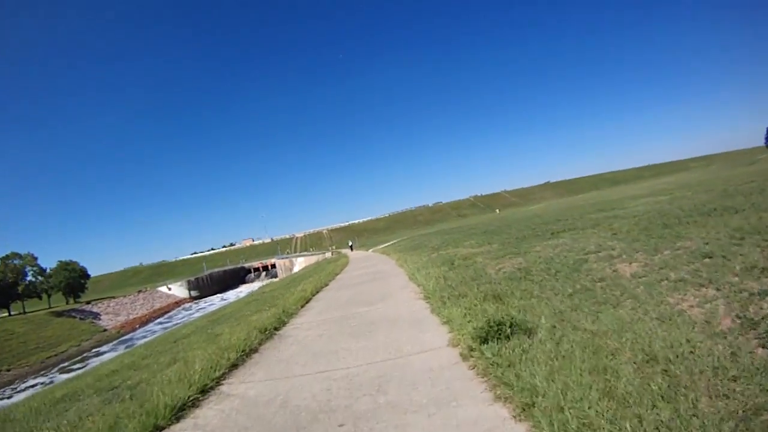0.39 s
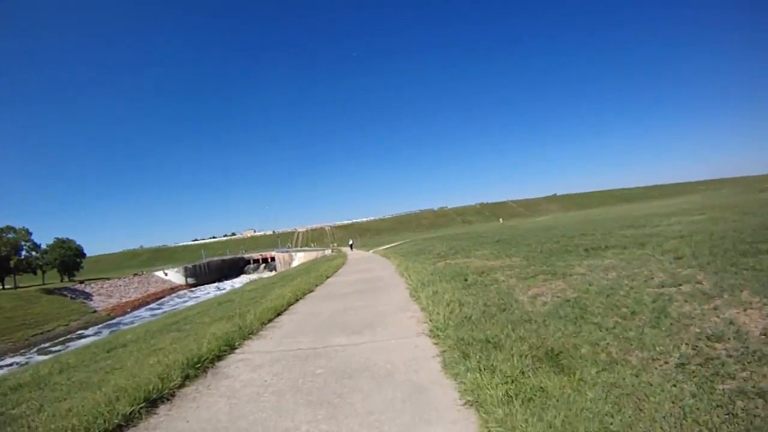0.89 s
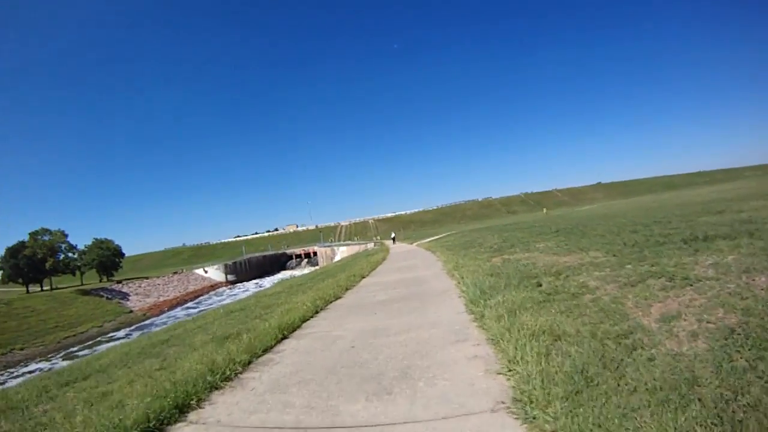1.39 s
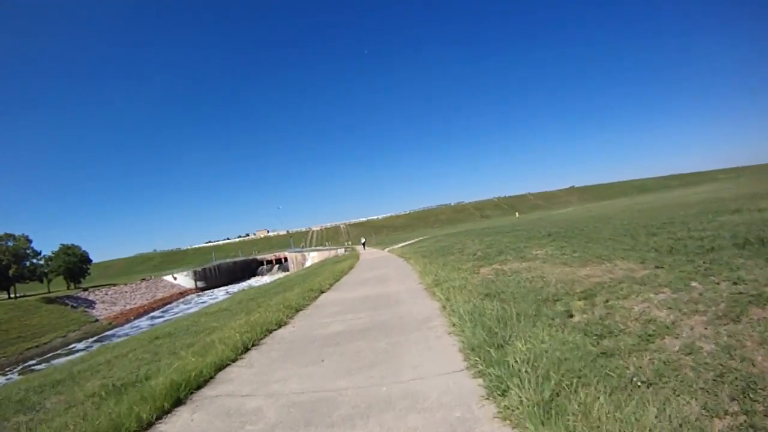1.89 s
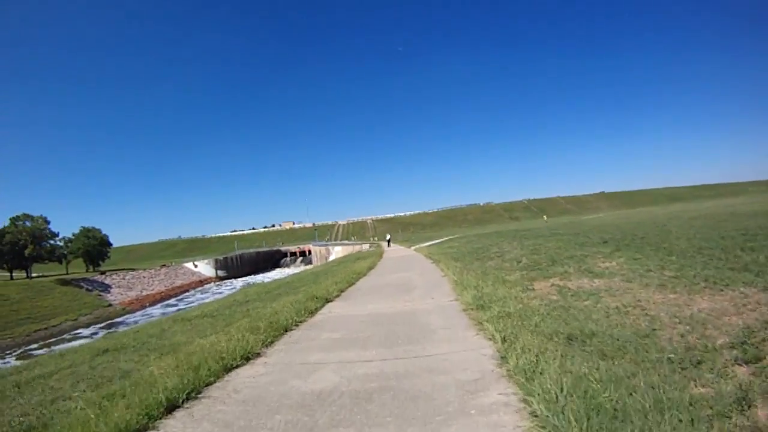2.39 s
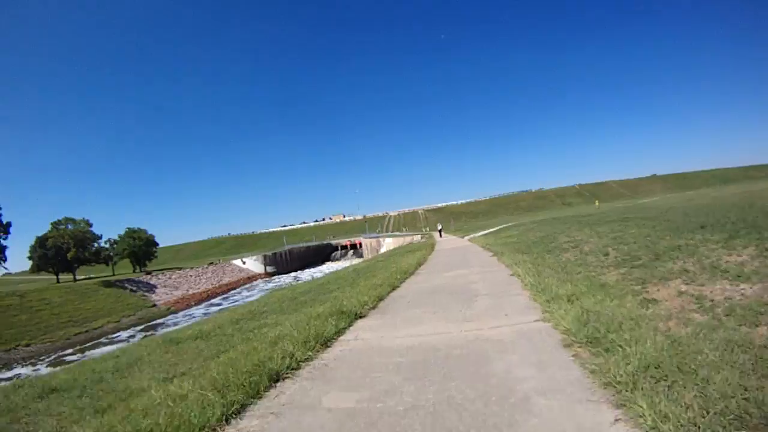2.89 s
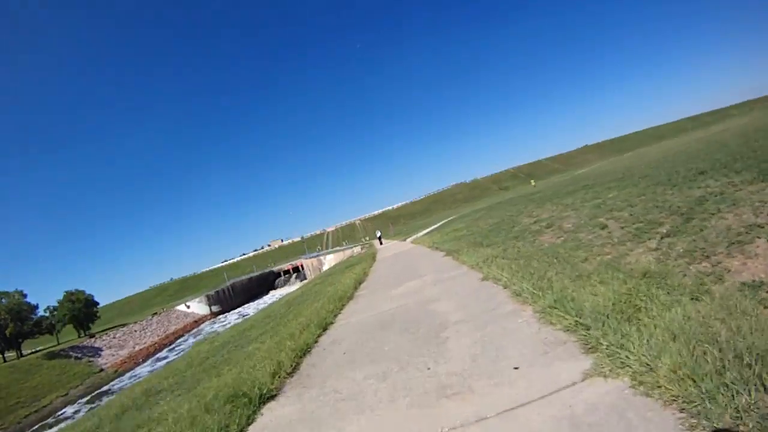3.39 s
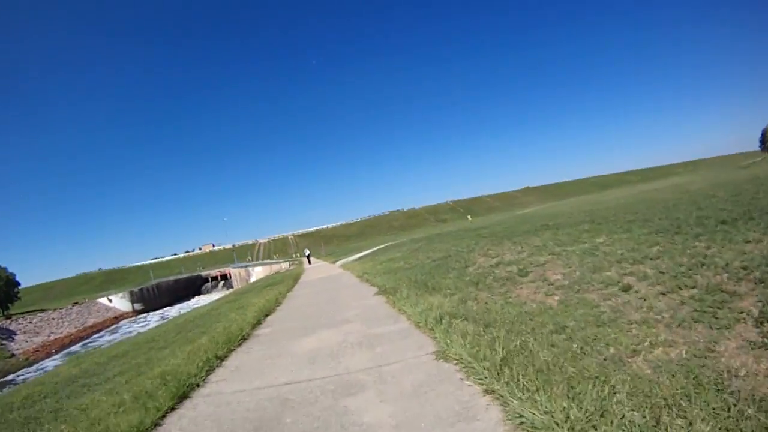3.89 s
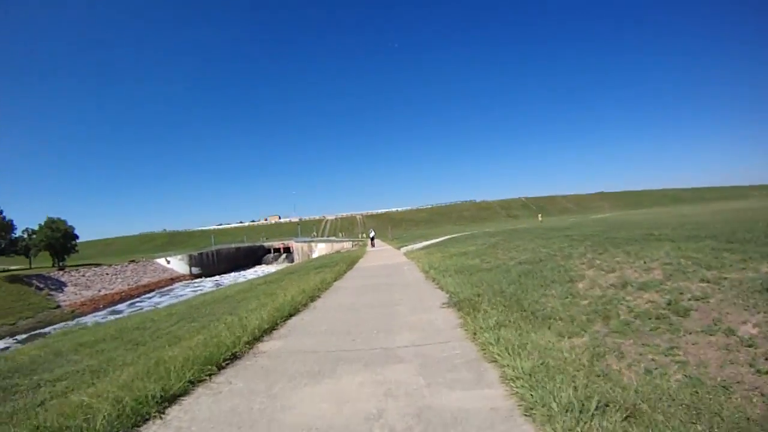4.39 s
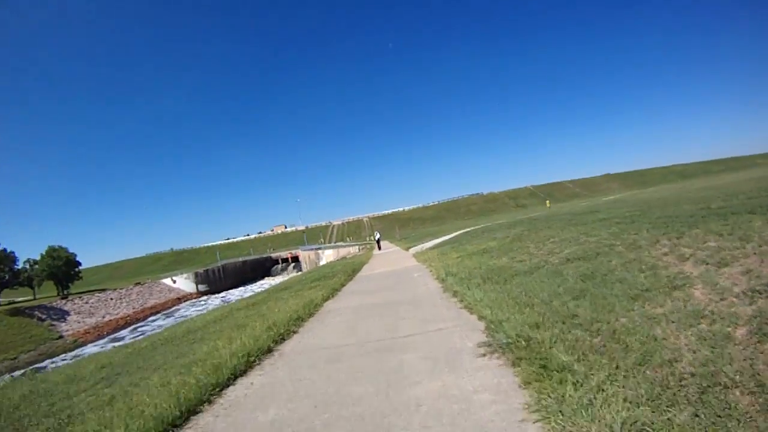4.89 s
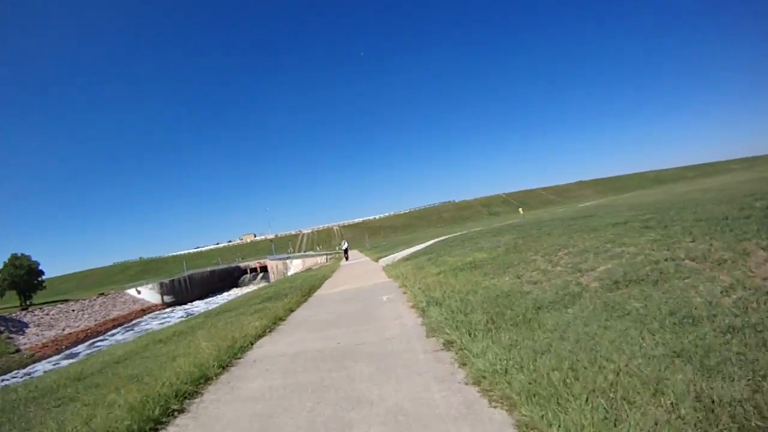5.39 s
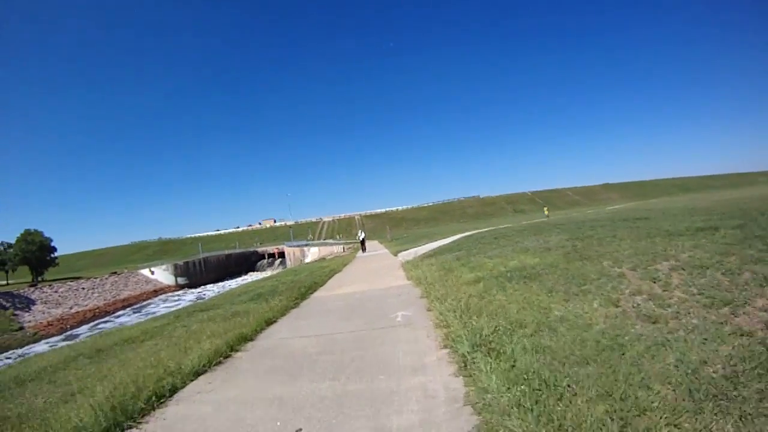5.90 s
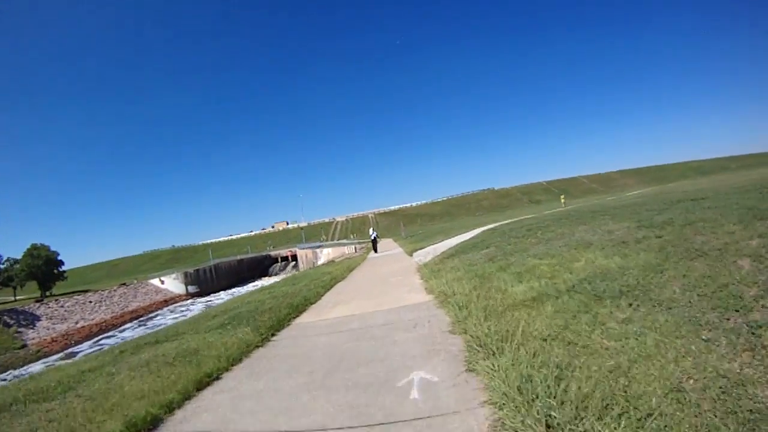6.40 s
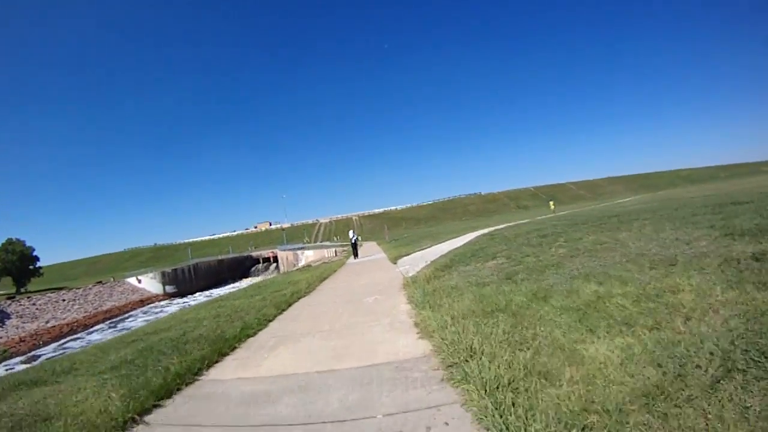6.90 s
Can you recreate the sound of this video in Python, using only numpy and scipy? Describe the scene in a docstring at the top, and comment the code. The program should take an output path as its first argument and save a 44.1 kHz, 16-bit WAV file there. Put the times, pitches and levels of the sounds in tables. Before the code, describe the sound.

A bicycle rides a concrete path, heard from a camera in a plastic housing on its frame. A low uneven hum of tyres and grit starts softly and grows after two seconds. Sharp hollow knocks, plastic rattles and brief metal pings arrive in irregular clusters, over light bass wind and a faint distant water hiss, open air, almost no echo.

```python
"""A low, uneven road hum under water hiss, soon broken by hard knocks, plastic rattle and short metal pings.
A camera in a plastic housing rides on a bicycle along a concrete path towards a water outlet.
Grit and pebbles drive frame resonances, bumps knock the mount, housing and a loose metal part ring in modes.
Shaped noise makes the bass wind and the far-off water; rough tone strokes make two insects in the grass."""
import sys
import numpy as np
from scipy import signal
from scipy.fft import rfft, irfft
from scipy.io import wavfile
from scipy.ndimage import uniform_filter1d

SR = 44100
rng = np.random.default_rng(int(sys.argv[2]) if len(sys.argv) > 2 else 0)


def volts(x):
    """Linear amplitude factor 10**(x/20) for a level x in dB, scalar or array-like."""
    e = np.asarray(x, float) / 20
    return 10 ** e


def generate_wav(signal):
    """Clip the signal to [-1, 1] and save it as 16-bit WAV at the path in sys.argv[1]."""
    frames = np.transpose(np.atleast_2d(signal))
    scaled = np.clip(frames, -1, 1) * 32767
    pcm = np.round(scaled).astype(np.int16)
    wavfile.write(sys.argv[1], SR, pcm)


N = 309582
T = np.arange(N) / SR

# course of the ride, levels before trims: t/s, road level/dB, water level/dB, wind level/dB
RIDE = [(0.0, -45.5, -57, -61), (0.49, -50.5, -60.5, -64.5), (0.94, -47, -55, -60),
        (1.15, -41.5, -53, -50.5), (1.64, -47, -55.5, -60), (2.23, -35.5, -46.5, -47),
        (2.54, -35, -45.5, -47.5), (2.87, -36.5, -48, -44), (3.11, -33, -45.5, -48.5),
        (3.44, -38, -50, -44), (3.99, -33, -45, -47.5), (4.18, -39.5, -47, -47),
        (4.53, -37.5, -48.5, -53.5), (5.36, -33, -45, -40), (5.59, -42.5, -56.5, -54),
        (5.92, -39.5, -50.5, -47), (6.26, -36, -48.5, -49.5), (7.02, -32.5, -46, -45.5)]
# direct blows on the mount: t/s, peak level/dB, f/Hz
KNOCKS = [(0.026, -30, 288), (0.2423, -5.5, 644), (0.2776, -29.5, 425), (0.6431, -28, 604),
          (0.6453, -21.5, 980), (0.655, -21, 960), (0.6788, -21, 537), (0.9639, -11.5, 525),
          (1.3175, -26, 890), (1.3192, -16.5, 870), (1.3255, -18.5, 1180), (1.347, -21, 620),
          (1.6028, -23.5, 650), (1.9731, -12.5, 860), (1.9863, -15, 900), (2.0081, -14.5, 880),
          (2.0591, -23.5, 590), (2.277, -17.5, 390), (2.631, -18, 460), (2.6477, -15, 337),
          (2.6634, -4.5, 845), (2.6694, -15.5, 1070), (2.906, -17, 620), (2.9166, -19.5, 270),
          (3.1559, -18, 570), (3.2773, -17.5, 500), (3.2806, -1.5, 980), (3.288, -15.5, 500),
          (3.292, -17, 298), (3.4381, -18.5, 700), (3.7561, -15, 620), (3.839, -17, 725),
          (3.8822, -17, 452), (3.8912, -6.5, 930), (3.9036, -13.5, 620), (3.9208, -15.5, 910),
          (3.962, -24, 905), (3.97, -21, 880), (4.0793, -23.5, 860), (4.1442, -8.5, 590),
          (4.1547, -8, 1190), (4.1644, -12.5, 318), (4.1728, -13, 1140), (4.188, -17, 500),
          (4.2226, -16, 450), (4.2315, -24, 482), (4.6839, -13.5, 860), (4.692, -11.5, 960),
          (4.7076, -10, 830), (4.9356, -19.5, 500), (4.942, -24, 500), (4.946, -17.5, 343),
          (4.9588, -18.5, 930), (4.9717, -24, 447), (5.122, -22, 347), (5.2614, -3.5, 1060),
          (5.274, -13.5, 880), (5.371, -9.5, 536), (5.3871, -19, 357), (5.469, -19.5, 410),
          (5.4895, -10.5, 540), (5.495, -25, 397), (5.5035, -16.5, 372), (5.513, -20.5, 403),
          (5.547, -28, 694), (5.5267, -17.5, 870), (5.822, -18, 860), (5.8295, -22.5, 1000),
          (5.843, -19, 820), (6.3652, -10.5, 855), (6.3788, -13, 860), (6.402, -18.5, 890),
          (6.8865, -7.5, 846), (6.8956, -6.5, 1100), (6.9081, -8, 940), (6.9145, -17, 990),
          (6.923, -14.5, 447)]
# louder taps of the housing: t/s, peak level in the middle treble/dB
TAPS = [(0.25, -32), (0.691, -41.5), (0.916, -40), (0.925, -46.5), (1.027, -44.5), (1.128, -41),
        (1.167, -45.5), (1.953, -39), (2.151, -42), (2.230, -38), (2.969, -35), (3.014, -35.5),
        (3.157, -34), (3.2537, -35), (3.289, -29), (3.527, -38), (3.870, -42), (5.8777, -37), (6.591, -32),
        (6.628, -36), (0.6534, -29.5), (0.68, -37), (0.7272, -37.5), (1.3264, -20.5), (1.3652, -36),
        (1.609, -38), (1.629, -35.5), (1.6504, -37.5), (1.805, -41), (1.9682, -32.5), (1.9867, -28.5),
        (2.009, -32), (2.0537, -28.5), (2.2843, -32), (2.3048, -32), (2.341, -47), (2.405, -39),
        (2.411, -33), (2.429, -31.5), (2.4582, -33), (2.4715, -30.5), (2.488, -36), (2.53, -45),
        (2.541, -34), (2.548, -32), (2.6215, -29), (2.633, -17), (2.6593, -22), (2.6687, -17),
        (2.7084, -31.5), (2.92, -28.5), (2.881, -37.5), (2.9286, -22), (3.105, -35), (3.2143, -32),
        (3.2807, -14), (3.303, -36), (3.328, -26), (3.4436, -25.5), (3.4783, -25), (3.8908, -25),
        (3.898, -25), (3.9085, -19.5), (3.9284, -35), (3.946, -34), (3.969, -28), (4.136, -27.5),
        (4.145, -32), (4.154, -27.5), (4.1635, -20.5), (4.183, -30), (4.192, -26.5), (4.378, -32),
        (4.69, -19.5), (4.707, -27.5), (4.729, -32), (4.937, -38), (4.9565, -23), (4.977, -36),
        (5.0512, -32), (5.1946, -30), (5.258, -23.5), (5.2607, -14), (5.2753, -29), (5.292, -32.5),
        (5.4962, -29), (5.5256, -32.5), (5.828, -26), (5.888, -41), (5.9262, -31.5), (6.064, -28),
        (6.082, -38), (6.102, -36), (6.314, -35), (6.362, -20), (6.379, -28), (6.402, -28.5), (6.519, -30),
        (6.787, -31), (6.83, -33), (6.8939, -13.5), (6.9065, -28), (6.91, -21), (6.9332, -30)]
# touches of the loose metal part: t/s, relative level/dB, upper modes re lower/dB
PINGS = [(0.071, -18, -8), (0.334, -22.5, -12), (0.4252, -22, -1), (0.7212, -13, -8), (0.990, -24, -12),
         (1.080, -16, -10), (1.261, -19, -23), (2.46, -16, 0), (2.8446, -19, 0), (3.012, -10, -10),
         (3.7503, -7, -2), (4.0758, -8.5, -9), (4.427, -20, -3), (4.5175, -26, 12.5), (5.4584, -14, -3),
         (5.61, -21, 0), (5.6868, -18, 1), (6.113, -26, 4), (6.131, -9, -5), (6.199, -7, -6),
         (6.2362, -15.5, -6), (6.268, -26, -5)]
# modes of frame and mount: f/Hz, width/Hz, relative level/dB
FRAME_MODES = [(183.6, 32, -3), (262, 53, 3.5), (328, 138, 2), (500, 36, -4), (676, 56, -4.5),
               (960, 55, -5.5), (1343, 100, -14.5)]
# modes of the plastic housing: f/Hz, width/Hz, relative level/dB
HOUSING_MODES = [(1258, 183, 6), (3410, 348, 2), (3976, 310, -1.5), (5267, 1002, -2), (5490, 1080, -12.5),
                 (8700, 1800, -33.5), (14200, 6400, -32.5)]
# modes of the metal part: f/Hz, t60/s, relative level/dB
METAL_MODES = [(950, .04, -3), (1380, .035, 0), (2035, .032, -5), (3550, .025, -23)]
# wind spectrum: f/Hz, relative density/dB
WIND_SPECTRUM = [(30, -23), (57, 16), (90, 10), (115, -22), (190, 2), (400, -79)]
# water spectrum: f/Hz, relative density/dB
WATER_SPECTRUM = [(1000, 2), (1500, -8.5), (2100, -9), (2800, -9), (3500, -7), (4500, -9.5), (5300, -18),
                  (6800, -24.5), (9000, -23.5), (15000, -35)]
# spectrum of each channel's own hiss: f/Hz, relative density/dB
CHANNEL_SPECTRUM = [(2500, -12), (5000, -14), (10000, -11), (13000, -37)]
# two insects: t/s, higher level/dB, higher f/Hz, lower level/dB
TRILL = [(0.8, -101, 11150, -98), (1.7, -83, 11250, -87), (1.95, -86, 11250, -84), (2.4, -79, 11050, -79),
         (2.9, -86, 11000, -83), (3.4, -86, 11200, -88), (3.75, -74, 11000, -75), (4.2, -88, 11100, -97),
         (5.2, -82, 10750, -82), (5.6, -98, 11500, -99), (6.7, -77, 11250, -91), (7.02, -85, 11200, -95)]


def unit(x):
    """Scale to rms 1."""
    return x / np.sqrt(np.mean(x ** 2))


def courses(table):
    """Interpolate each column after t/s over the whole scene."""
    t_s, *columns = np.transpose(table)
    return [np.interp(T, t_s, column) for column in columns]


def band(x, f_hz, width_hz):
    """One resonance, gain 1 at its centre."""
    return signal.lfilter(*signal.iirpeak(f_hz, f_hz / width_hz, fs=SR), x)


def ring(x, modes):
    """Sum of resonances, neighbours in opposite phase."""
    total = 0
    for k, (f_hz, width_hz, level_db) in enumerate(modes):
        total = total + (-1) ** k * volts(level_db) * band(x, f_hz, width_hz)
    return total


def colour(spectrum):
    """Noise with the given spectrum, interpolated over log frequency, rms 1."""
    f_hz, density_db = np.transpose(spectrum)
    bins_hz = np.fft.rfftfreq(N, 1 / SR) + 1
    gain = volts(np.interp(np.log(bins_hz), np.log(f_hz), density_db))
    return unit(irfft(rfft(rng.standard_normal(N)) * gain, N))


def walk(rate_hz):
    """Random levels held 1 / rate_hz and slewed twice, rms 1."""
    hold = int(SR / rate_hz)
    steps = np.repeat(rng.standard_normal(N // hold + 1), hold)
    slewed = uniform_filter1d(uniform_filter1d(steps, hold), hold)
    return unit(slewed[:N])


def grains(rate_hz, spread_db):
    """Random impulses of either sign, a few much larger than the rest."""
    hits = rng.random(N) < rate_hz / SR
    sign = rng.choice([-1, 1], N)
    size = np.minimum(rng.exponential(size=N), 4)
    return hits * sign * volts(spread_db * size)


def add(out, t_s, shape):
    """Lay a short sound in so that its deepest inward swing falls at t_s."""
    i = max(int(t_s * SR) - np.argmin(shape), 0)
    out[i:i + len(shape)] += shape[:N - i]


def smear(x, fade_s, length):
    """Noise under exponential fades started by x."""
    envelope = signal.fftconvolve(x, np.exp(-T[:length] / fade_s))[:N]
    return envelope * rng.standard_normal(N)


def mount(x):
    """Rubber between frame and mount takes off the treble."""
    return signal.sosfilt(signal.butter(3, 1550, fs=SR, output="sos"), x)


def channel_hiss(level_db):
    """A channel's own faint steady hiss: shaped noise."""
    return volts(level_db) * colour(CHANNEL_SPECTRUM)


def insect(rate_hz, f_hz, level_db):
    """Wings scrape in regular short strokes, each a slightly rough tone sliding upward in pitch."""
    stroke = np.minimum(T * rate_hz % 1 / 0.75, 1)  # 0 to 1, then a pause
    pitch_hz = f_hz * (1 + 0.007 * walk(400) - 0.05 * (1 - stroke) ** 2)
    tone = np.sin(2 * np.pi * np.cumsum(pitch_hz) / SR)
    rough = tone * (1 + walk(900))
    return unit(rough * np.sin(np.pi * stroke)) * volts(level_db)


def insects():
    """Two wing-scrapers, the second a little lower and slower."""
    rate_hz, low_hz = 71.5, 10400
    high_db, high_hz, low_db = courses(TRILL)
    return insect(rate_hz, high_hz, high_db) + insect(0.88 * rate_hz, low_hz, low_db)


def water(hiss_db):
    """Far-off water: shaped noise with a flickering level."""
    flicker_db = 2.2 * walk(25)
    return colour(WATER_SPECTRUM) * volts(hiss_db - 10.5 + flicker_db)


def wind(wind_db):
    """Wind thumps: bass noise with gusting level."""
    gusts_db = 3.0 * walk(14)
    return colour(WIND_SPECTRUM) * volts(wind_db + gusts_db)


def chatter(touch, fade_s):
    """Each touch is a firm contact followed by a few milliseconds of quick random ones."""
    return volts(16) * touch + smear(touch, fade_s, 1500)


def pings(faint_db):
    """Loose metal chatters and rings, duller or brighter by touch point; faint touches follow the road level."""
    low = grains(41, 1.0) * volts(faint_db - 7)
    high = grains(45, 0.85) * volts(faint_db - 4)
    for t_s, level_db, upper_db in PINGS:
        i = int(t_s * SR)
        low[i], high[i] = volts(level_db), volts(level_db + upper_db)
    # t60 to resonance width
    modes = [(f_hz, np.log(1000) / np.pi / t60_s, level_db) for f_hz, t60_s, level_db in METAL_MODES]
    return ring(chatter(low, 0.0052), modes[:2]) + ring(chatter(high, 0.0079), modes[2:])


def rattle(faint_db):
    """Plastic on plastic: a tap and a millisecond scrape ring the housing; faint ones follow the water level."""
    out, t = np.zeros(N), T[:220]
    scrape = (1 - np.exp(-t / 0.0001)) * np.exp(-t / 0.0018)
    tap = 4 * np.exp(-((t - 0.0004) / 0.00003) ** 2)
    for t_s, peak_db in TAPS:
        noise = rng.standard_normal(len(t))
        sound = ring(scrape * noise - tap, HOUSING_MODES)
        add(out, t_s, volts(peak_db) * sound / np.abs(band(sound, 2700, 8600)).max())
    touches = grains(220, 2.6) * volts(3 * walk(12))
    faint = signal.fftconvolve(touches, scrape)[:N] * rng.standard_normal(N)
    return out + unit(ring(faint, HOUSING_MODES)) * volts(faint_db)


def pebbles(level_db):
    """Small stones under the tyres give light, hollow taps through the mount."""
    taps = grains(90, 3.2) * volts(2.5 * walk(6))
    first = band(taps, 890, 220)
    second = volts(2.0) * band(np.roll(taps, 40), 920, 200)
    return unit(mount(first - second)) * volts(level_db)


def road(level_db):
    """Grit and cracks under the tyres push the frame in uneven jolts; it hums at its modes."""
    push = unit(grains(450, 1.3)) + 0.98 * rng.standard_normal(N)
    # each mode swells and fades on its own as the load shifts
    hum = sum(ring(push * volts(2.8 * walk(40)), [mode]) for mode in FRAME_MODES)
    sway_db = 2.2 * walk(35)
    return unit(mount(hum) * volts(sway_db)) * volts(level_db)


def knocks(road_db):
    """Soft-edged blows, inward first, duller ones rebounding more; housing, frame and stem answer."""
    out, t = np.zeros(N), T[:800]
    for t_s, peak_db, f_hz in KNOCKS:
        cycle = t * f_hz
        fade_cycles = 0.23 * (950 / f_hz) ** 0.55
        blow = -np.sin(2 * np.pi * cycle) * cycle ** 1.4 * np.exp(-cycle / fade_cycles)
        add(out, t_s, volts(peak_db) * blow / np.abs(blow).max())
    housing = volts(-6.0) * ring(out, HOUSING_MODES[:1])
    # the frame shudders for some milliseconds
    shudder = smear(np.abs(out), 0.003, 2600)
    frame = volts(-26) * mount(ring(shudder, FRAME_MODES))
    # the mount rocks on its stem, more on rough going
    rocking = band(np.abs(out), 51, 39.0) * volts(0.36 * (road_db - road_db.max()))
    return out + housing + frame + volts(2.5) * rocking


def scene():
    """Nearly everything arrives through the housing, almost alike in both channels."""
    road_db, hiss_db, wind_db = courses(RIDE)
    blows = knocks(road_db)
    mid = insects() + water(hiss_db) + wind(wind_db)
    mid += pings(road_db + 12.0) + rattle(hiss_db - 11)
    mid += pebbles(road_db - 12.0) + road(road_db) + blows
    # slight left/right difference, more under blows
    side = volts(-39.0) * band(np.roll(mid, 60), 260, 670)
    side += volts(-14.5) * band(np.roll(mid, 9), 13100, 6000)
    side += volts(-45.5) * np.roll(blows, 30) + volts(-38) * band(blows, 410, 500)
    return np.array([mid + side + channel_hiss(-83.5), mid - side + channel_hiss(-82.5)])


def band_limit(x):
    """A steep low-pass at the top of the band."""
    return signal.sosfilt(signal.butter(12, 15970, fs=SR, output="sos"), x)


def record(dry):
    """The microphone loses the deepest bass and the top; the converter clips at full scale."""
    bass_cut = signal.butter(2, 45, "high", fs=SR, output="sos")
    top_cut = signal.ellip(6, 0.5, 50, 15300, fs=SR, output="sos")
    clipped = np.clip(signal.sosfilt(bass_cut, dry), -1, 1)
    heard = signal.sosfilt(top_cut, clipped)
    return band_limit(heard)


dry = scene()
out = record(dry)
generate_wav(out)
```